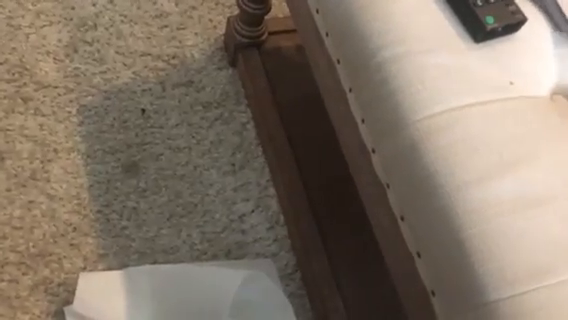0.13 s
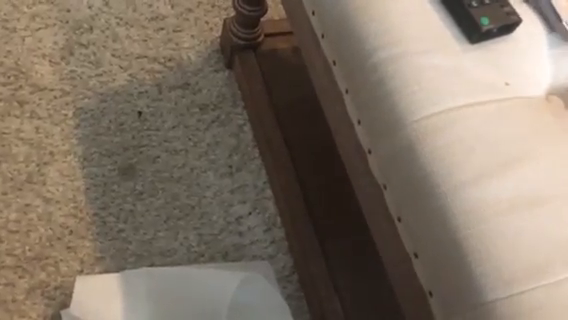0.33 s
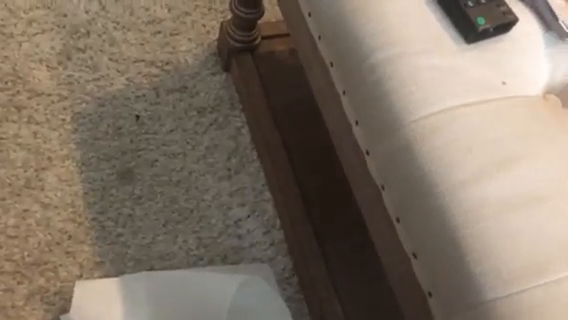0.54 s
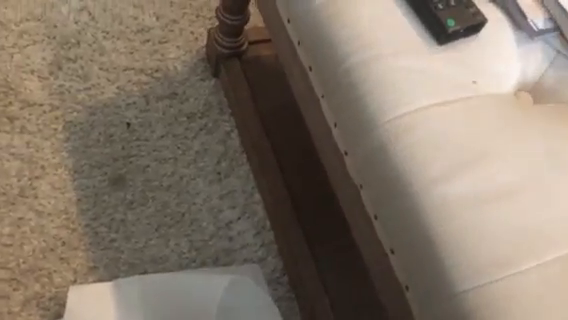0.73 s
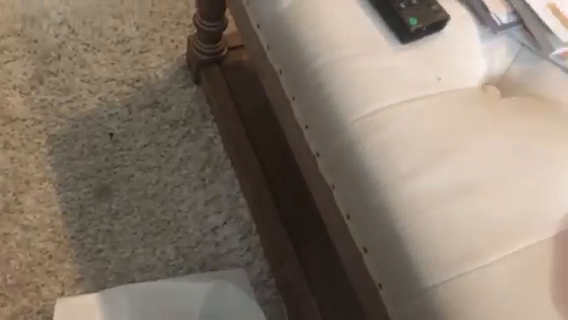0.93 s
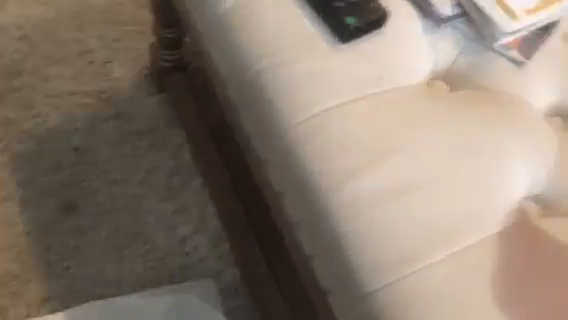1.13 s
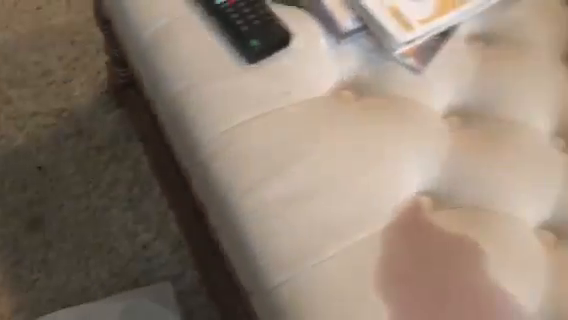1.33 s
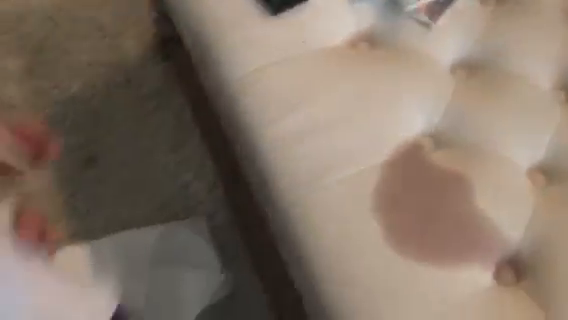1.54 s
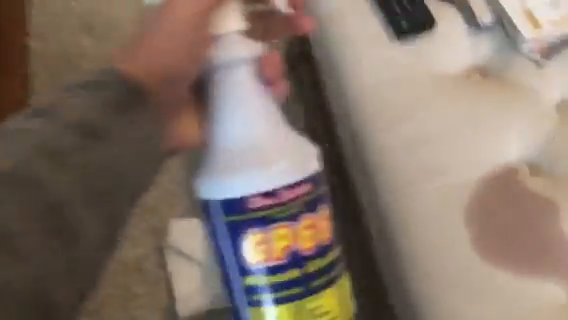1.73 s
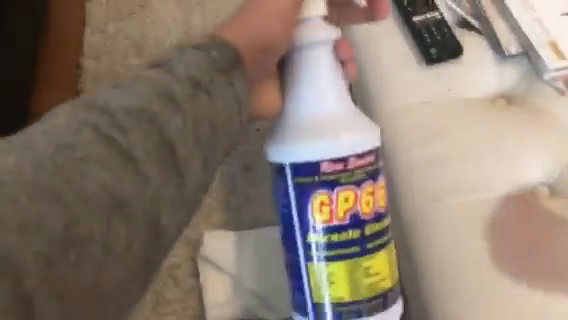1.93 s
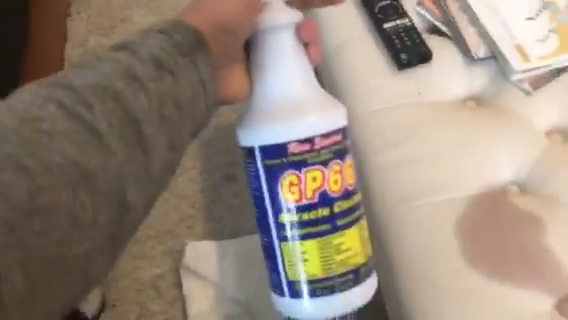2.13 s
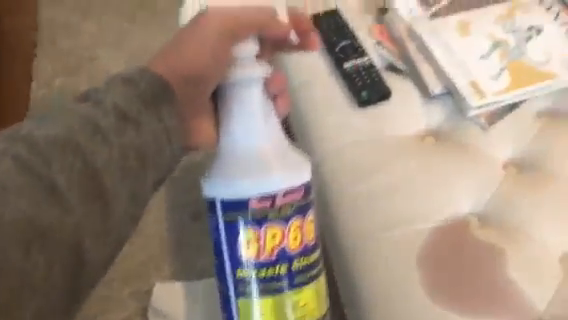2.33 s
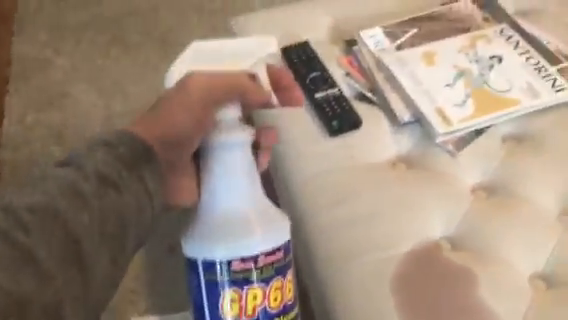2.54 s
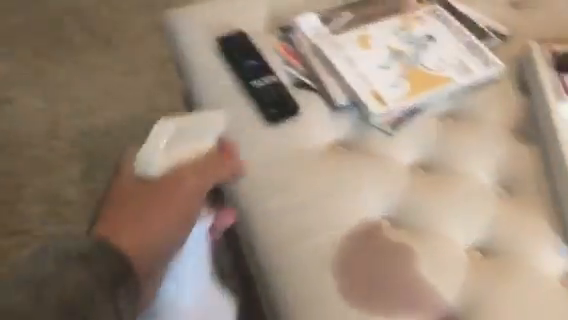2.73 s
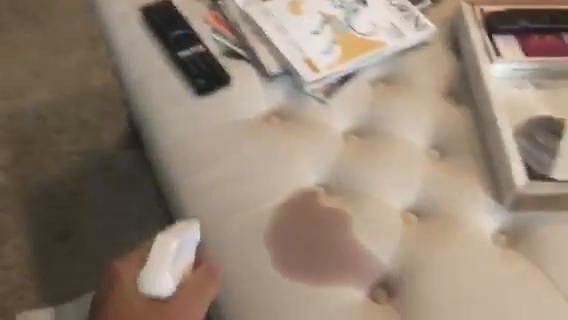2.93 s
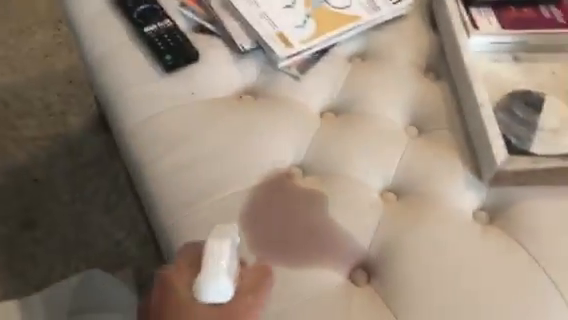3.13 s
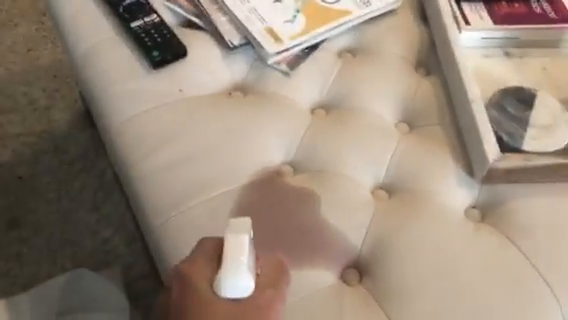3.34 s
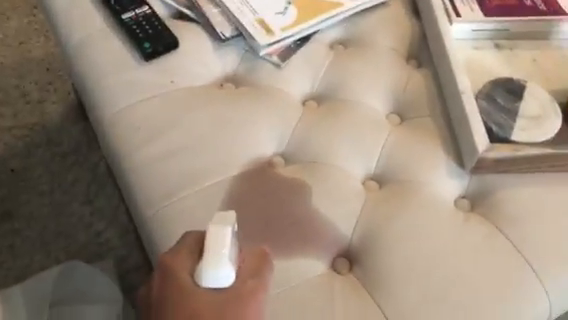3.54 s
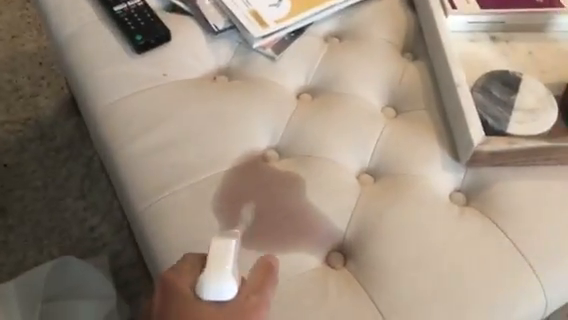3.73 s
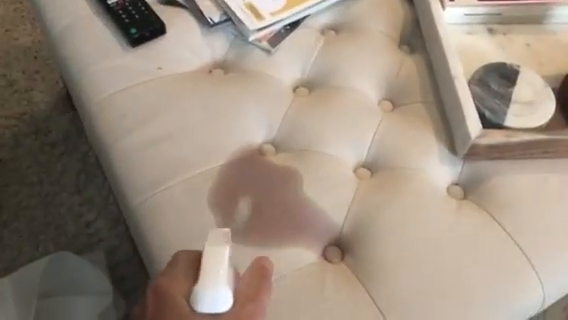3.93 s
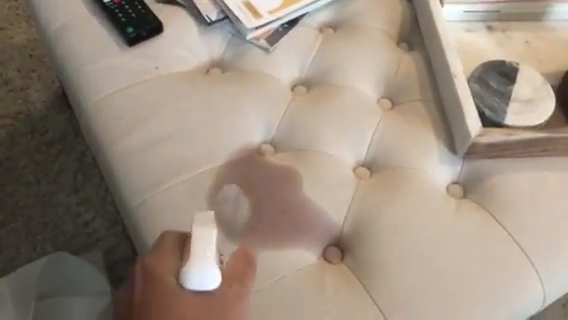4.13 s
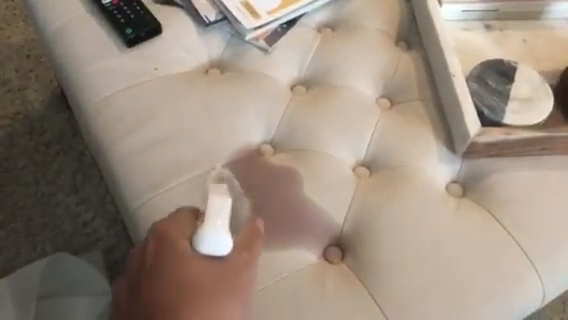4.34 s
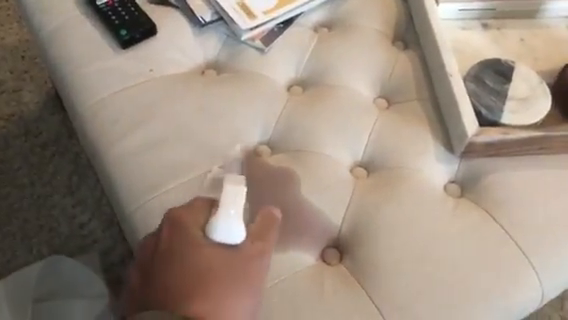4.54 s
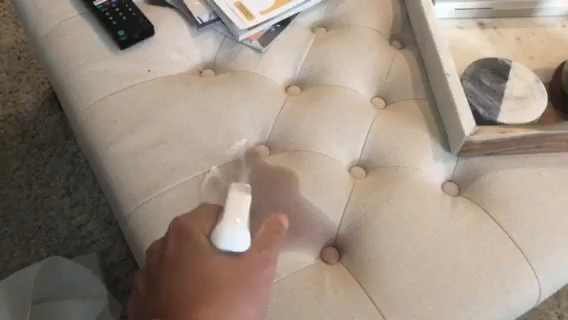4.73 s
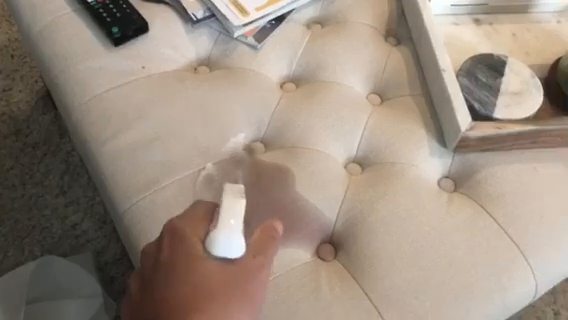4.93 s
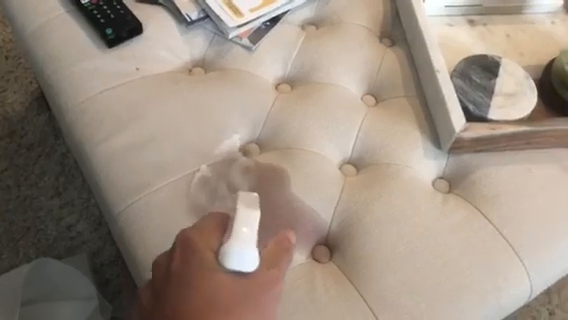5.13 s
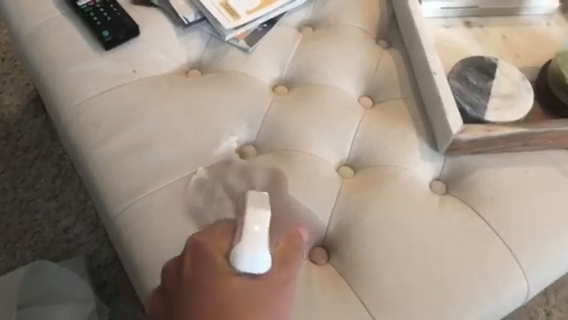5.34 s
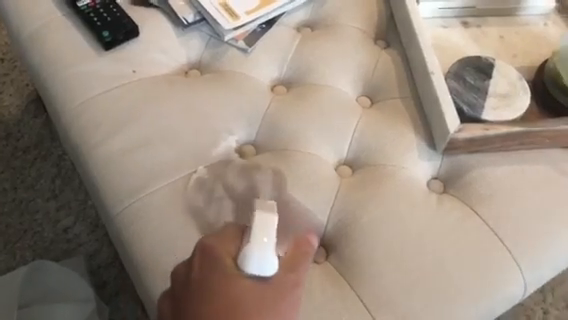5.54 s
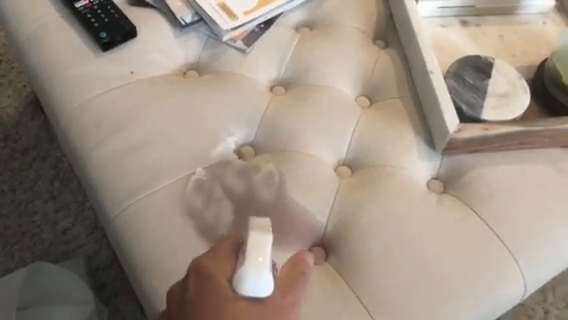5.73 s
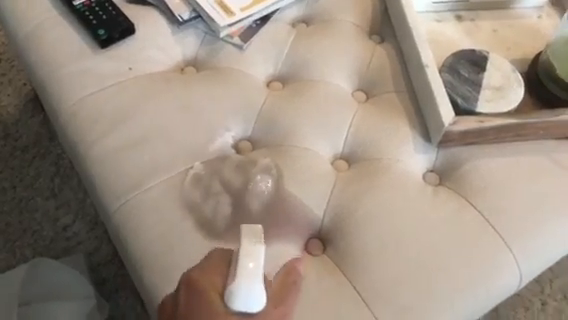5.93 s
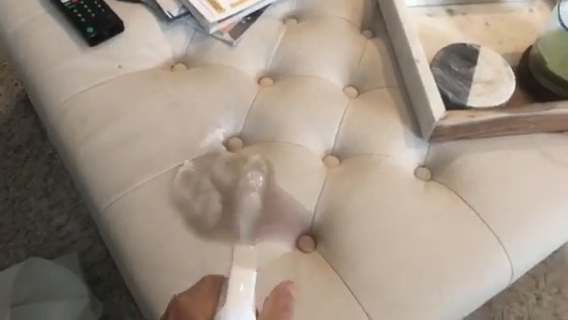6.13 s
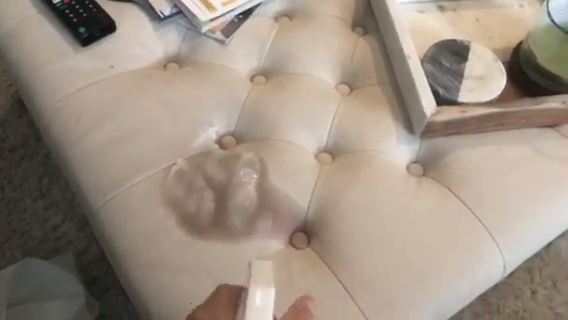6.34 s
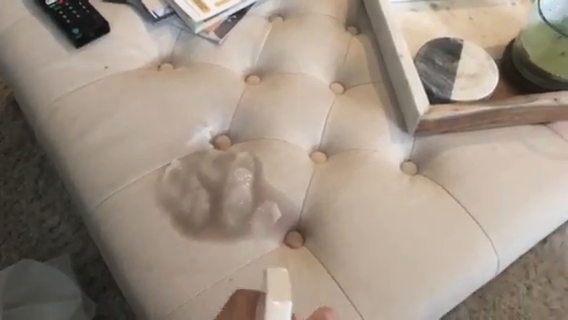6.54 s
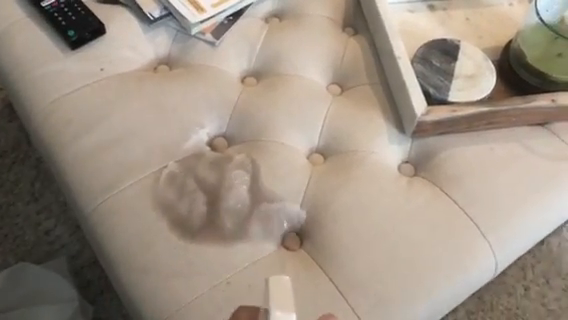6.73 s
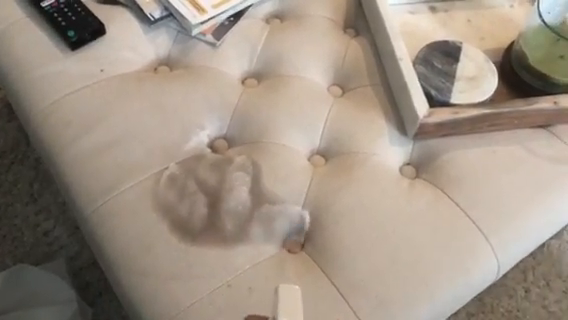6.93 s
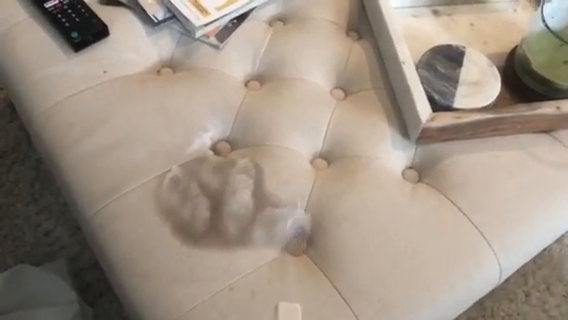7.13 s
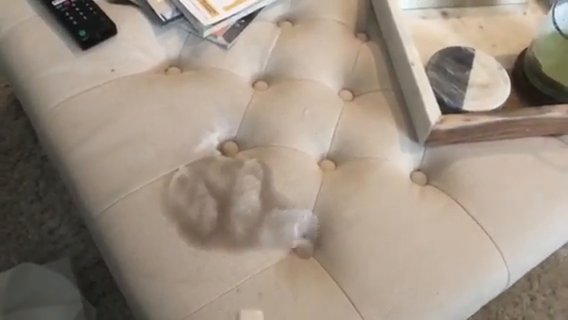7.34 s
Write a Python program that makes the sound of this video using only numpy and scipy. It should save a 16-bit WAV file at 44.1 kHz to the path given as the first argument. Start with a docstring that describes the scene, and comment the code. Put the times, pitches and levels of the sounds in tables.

```python
"""A plastic trigger spray bottle is pumped fourteen times at an upholstered stool, after being taken hold of.
Random drops, coloured by spectra and moving resonances, make the spit, hiss, patter and slurp of each stroke.
Decaying modes make the trigger's clack and the valve's gulp; gliding narrow noise makes the squeaks.
Noise knocks and brushing come before. A faint room tail and a low rumble with a hum lie behind."""
import sys
import numpy as np
from scipy import signal
from scipy.fft import rfft, irfft
from scipy.io import wavfile

SR = 44100
rng = np.random.default_rng(int(sys.argv[2]) if len(sys.argv) > 2 else 0)


def pcm_store(signal):
    """Save signal as 16-bit PCM."""
    levels = np.round(np.clip(np.atleast_2d(signal), -1, 1) * 32767)
    wavfile.write(sys.argv[1], SR, levels.astype(np.int16).T)


N = 325899
T = np.arange(N) / SR


def undb(db):
    """Decibels to gain."""
    return 10 ** (np.asarray(db) / 20)


def unit(x):
    """Scale to rms 1."""
    return x / np.sqrt(np.mean(x ** 2))


def add(track, at_s, sound):
    """Mix a sound in from a time in seconds."""
    i = max(int(at_s * SR), 0)
    track[i:i + len(sound)] += sound[:max(N - i, 0)]


def colour(x, spectrum):
    """Shape x by a spectrum, interpolated over log frequency; rms 1."""
    log_f = np.log2(np.fft.rfftfreq(len(x), 1 / SR) + 1)
    hz, db = np.transpose(spectrum)
    gain = undb(np.interp(log_f, np.log2(hz), db))
    return unit(irfft(rfft(x) * gain, len(x)))


def band(x, hz, spread):
    """Band-pass from hz / spread to hz * spread."""
    spread = max(spread, 1.05)
    edges_hz = np.clip([hz / spread, hz * spread], 10, .48 * SR)
    return signal.sosfilt(signal.butter(2, edges_hz, "band", fs=SR, output="sos"), x)


def walk(size, rate):
    """Smooth chance with a spread near 1: rate random points a second, joined by lines."""
    steps = np.arange(size) * rate / SR
    points = int(steps[-1]) + 2
    return np.interp(steps, np.arange(points), rng.standard_normal(points))


def drops(size, rate, scatter_db):
    """Random tiny impacts of uneven strength, rate a second."""
    hits = rng.random(size) < rate / SR
    signs = rng.choice([-1, 1], size)
    strength_db = scatter_db * np.clip(rng.standard_normal(size), -2, 2)
    return hits * signs * undb(strength_db)


def fade(t, t60):
    """Exponential decay, 60 dB in t60 seconds."""
    return np.exp(-np.log(1000) * t / t60)


def ring(modes, detune):
    """One blow on a set of decaying modes, each slightly detuned at random; peak 1."""
    t = T[:SR // 6]
    y = np.zeros(len(t))
    for hz, db, t60 in modes:
        sign = rng.choice([-1, 1])
        detuned_hz = hz * (1 + detune * rng.standard_normal())
        y += undb(db) * sign * np.sin(2 * np.pi * detuned_hz * t) * fade(t, t60)
    return y / np.abs(y).max()


def echo(x, lag_s, share):
    """Add one reflection."""
    t = T[:len(x)]
    return x + share * np.interp(t - lag_s, t, x, left=0)


def resonance(hz, width_hz):
    """Turbulence ringing in a resonance whose centre moves: smoothed noise on a carrier; rms 1."""
    phase = 2 * np.pi * np.cumsum(hz) / SR
    smooth = signal.butter(2, np.clip(width_hz / 2, 10, SR / 4), fs=SR, output="sos")
    a, b = signal.sosfilt(smooth, rng.standard_normal((2, len(hz))))
    return unit(a * np.cos(phase) + b * np.sin(phase))


# Colour of the spray in air. Each row: frequency in Hz, density in dB per Hz.
MIST_SPECTRUM = [(100, -53), (400, -25), (1500, -4.5), (2300, -15), (2900, -7), (3400, -10.5), (4000, -5.5),
                 (4900, -8), (6000, -4.5), (7300, -2), (8800, 2), (10500, -1.5), (13000, -1.5),
                 (16000, -5.5)]
SPIT_DB = -48


def spit(t, reach_s, width=0.3):
    """Just before landing, low pressure breaks the jet into coarse spurts: sparse, very uneven drops."""
    size = len(t)
    spurts = band(colour(drops(size, rate=9500, scatter_db=10.5), MIST_SPECTRUM), hz=7400, spread=2.9)
    spurts *= undb(SPIT_DB + 3.1 * walk(size, rate=310))
    return spurts * np.exp(-((t / reach_s + .46) / width) ** 2 / 2)


OPEN_S, OPEN_DB, HISS_RELEASE_DB_PER_S = 0.036, 5.5, 444


def hiss(t, progress, jet_s, hiss_db, nozzle_hz, nozzle_db):
    """The cone of mist opens, holds for the jet length and collapses: dense drops plus the nozzle's swirl."""
    size = len(t)
    # the swirl sinks in pitch and stands out more as the pressure falls
    swirl = resonance(nozzle_hz * np.exp(-.55 * progress), width_hz=1700)
    swirl *= undb(nozzle_db + 8.8 * progress)
    mist = colour(drops(size, rate=16000, scatter_db=7.5), MIST_SPECTRUM) + swirl
    opening_db = -OPEN_DB * np.clip(1 - t / OPEN_S, 0, 1)
    collapse_db = -HISS_RELEASE_DB_PER_S * np.maximum(t - jet_s, 0)
    return mist * undb(hiss_db + opening_db + collapse_db + 0.37 * walk(size, rate=169))


# Colour of droplets on cloth. Each row: frequency in Hz, density in dB per Hz.
CLOTH_SPECTRUM = [(80, -34), (180, -7), (320, 4), (480, -1.5), (680, 2.5), (950, -1), (1400, -2.5),
                  (2100, -5.5), (2800, -4), (3900, -8.5), (5000, -11.5), (8000, -18), (16000, -23)]
FLIGHT_S, PATTER_SAG_DB_PER_S, PATTER_RELEASE_DB_PER_S = .025, 44, 219


def patter(t, progress, jet_s, patter_db, patch_hz, patch_db, splash_db=-1.0):
    """Droplets drum on the cloth, thin out with the jet and go on falling a little longer."""
    size = len(t)
    # the wet patch rings a little higher as it fills
    patch_centre_hz = patch_hz * np.exp(.25 * progress + 0.0798 * walk(size, rate=60))
    patch = resonance(patch_centre_hz, width_hz=0.49 * patch_hz)
    impacts = colour(drops(size, rate=2400, scatter_db=3.0), CLOTH_SPECTRUM) + undb(patch_db) * patch
    impacts += undb(-14.5) * resonance(np.full(size, 2900.), width_hz=290)  # a thin ring in the spray
    thinning_db = PATTER_SAG_DB_PER_S * t
    thinning_db += PATTER_RELEASE_DB_PER_S * np.maximum(t - jet_s - FLIGHT_S, 0)
    onset_db = splash_db * np.exp(-(t / 0.0062) ** 2)  # slightly softer first milliseconds
    return impacts * undb(patter_db - thinning_db + onset_db + 0.69 * walk(size, rate=103.0))


# Colour of the refill. Each row: frequency in Hz, density in dB per Hz.
SLURP_SPECTRUM = [(100, -45), (300, 3), (700, -4), (1120, -3), (1400, -8), (2000, -7.5), (2750, -4),
                  (3150, -21), (3650, -1.5), (4300, -7), (5600, -4), (7000, -5), (9300, -6), (10500, -16.5),
                  (16000, -19)]


def slurp(t, draw_s=0.17, half_width_s=0.035, slurp_db=-60):
    """Liquid and air bubbles squeeze through the inlet as the spring returns: drops plus a wandering gurgle."""
    size = len(t)
    gurgle = resonance(3400 * np.exp(0.2 * walk(size, rate=42)), width_hz=490)
    refill = colour(drops(size, rate=1600, scatter_db=4.5), SLURP_SPECTRUM) + undb(-8.5) * gurgle
    refill *= undb(slurp_db + 2.8 * walk(size, rate=90))
    return refill * np.exp(-((t - draw_s) / half_width_s) ** 2)


# The pump strokes. Each row: finger strikes the trigger in seconds, its level in dB, spray lands in seconds,
# jet length in seconds, hiss level in dB, patter level in dB, mid-jet nozzle resonance in Hz,
# its mid-jet share in dB, mid-jet wet patch resonance in Hz, its share in dB.
STROKES = [(3.775, -49, 3.811, 0.051, -43.5, -47, 12300, -25, 1500, -14),
           (4.037, -48, 4.069, 0.07, -40.5, -47.5, 9500, -18, 850, -23),
           (4.284, -46, 4.325, 0.079, -40.5, -46.5, 8900, -20, 329, -15),
           (4.543, -43.5, 4.584, 0.07, -43, -47, 10800, -26, 559, -10),
           (4.784, -35, 4.829, 0.071, -43, -47, 9960, -5, 502, -4.5),
           (5.039, -38.5, 5.081, 0.076, -39.5, -46, 9240, -7, 1252, -12),
           (5.296, -35, 5.340, 0.084, -43.5, -47.5, 9640, -8.5, 590.5, -3.5),
           (5.5707, -35.5, 5.611, 0.085, -42, -46.5, 9400, -6, 645, -8.5),
           (5.833, -37, 5.884, .08, -41.5, -46, 8000, -5.5, 1000, -16),
           (6.113, -38.5, 6.153, 0.093, -41.5, -46.5, 8150, -7, 1398, -17),
           (6.3926, -33.5, 6.434, .083, -40, -47, 8530, -15, 470.7, -5),
           (6.666, -31.5, 6.710, 0.07, -42, -44, 11800, -20, 805.5, -9.5),
           (6.920, -38, 6.968, 0.079, -43, -48.5, 9000, -23, 1483, -2),
           (7.178, -31.5, 7.219, 0.076, -40.5, -49.5, 9400, -30, 845, -7.5)]
CUSHION_ECHO_MS = 0.707


def sprays(lead_s=.055):
    """Each stroke spits, hisses and patters with one reflection off the cushion, then sucks in more liquid."""
    out = np.zeros(N)
    t = T[:SR // 3] - lead_s  # counted from the landing
    for pull_s, _, land_s, jet_s, hiss_db, patter_db, nozzle_hz, nozzle_db, patch_hz, patch_db in STROKES:
        progress = np.clip(t / (jet_s + FLIGHT_S), 0, 1) - .5
        landed = np.clip(t / .0015, 0, 1) * np.clip((t[-1] - t) / .02, 0, 1)
        jet = hiss(t, progress, jet_s, hiss_db, nozzle_hz, nozzle_db)
        jet += patter(t, progress, jet_s, patter_db, patch_hz, patch_db)
        spray = spit(t, land_s - pull_s) + landed * jet
        add(out, land_s - lead_s, echo(spray, CUSHION_ECHO_MS / 1000, share=0.066) + slurp(t))
    return out


# Modes of the trigger. Each row: frequency in Hz, level in dB, t60 in seconds.
TRIGGER_MODES = [(1081, -6.5, 0.04), (1620, -33, .025), (2277, 0.5, 0.016), (2760, 2, 0.02),
                 (3250, 0.5, 0.016), (3725, 3.5, 0.014), (5300, 5, 0.0071), (5700, -3, 0.0074),
                 (8230, -1, .008)]


def plastic_click(treble_db):
    """The trigger's modes, a short bright crack and a brief chatter of loose parts."""
    body = ring(TRIGGER_MODES, detune=0.059)
    t = T[:len(body)]
    crack = unit(band(rng.standard_normal(len(t)), hz=8000, spread=3.6)) * fade(t, t60=0.0045)
    chatter = unit(band(rng.standard_normal(len(t)), hz=2930, spread=3.04)) * fade(t, t60=0.032)
    return body + undb(treble_db - 8.5) * crack + undb(-16) * chatter


# Modes of the valve. Each row: frequency in Hz, level in dB, t60 in seconds.
VALVE_MODES = [(520, 3, 0.047), (650, 1, 0.028), (1035, -21, 0.12)]
# Modes of the bottle. Each row: frequency in Hz, level in dB, t60 in seconds.
BOTTLE_MODES = [(175, 9.6, 0.054), (232, 8.1, 0.05), (357, 3.3, 0.045)]
THUD_DB = -1


def valve_gulp():
    """The valve shuts on the liquid: valve and bottle modes that swell in softly."""
    gulp = ring(VALVE_MODES, detune=0.093) + undb(THUD_DB) * ring(BOTTLE_MODES, detune=0.16)
    swell = 1 - fade(T[:len(gulp)], t60=.022)
    return gulp / (1 + undb(THUD_DB)) * swell


# Single trigger clicks. Each row: start in seconds, level of the modes in dB,
# treble setting in dB (the crack starts 8.5 dB below it, relative to the modes).
CLICKS = [(3.72, -58, 9), (3.758, -49.5, 12), (3.9806, -29, 6.5), (4.048, -44, 18), (4.2406, -28.5, -15),
          (4.301, -44, 14), (4.509, -32.5, -9), (5.0122, -31, -8)]
RATTLE_S, RATTLE_DB, GULP_LAG_S = .009, -2.5, 0.00516
# the piston's return, counted from the landing
RETURN_S, RETURN_SPREAD_S, TICK_DB = 0.18, .04, -48.5


def pump(rattles=3):
    """The trigger clacks and rattles under the finger, the valve gulps, the spring ticks as the piston returns."""
    out = np.zeros(N)
    for pull_s, db, land_s, *_ in STROKES:
        add(out, pull_s, undb(db) * plastic_click(treble_db=3.5))
        for k, chance in enumerate(rng.random(rattles)):
            rattle_s = pull_s + RATTLE_S * (k + .5 + chance) / rattles
            add(out, rattle_s, undb(db + RATTLE_DB) * plastic_click(treble_db=-14))
        add(out, pull_s + GULP_LAG_S, undb(db) * valve_gulp())
        for when, strength in rng.uniform(-1, 1, (2, 2)):
            tick = undb(TICK_DB + 6.6 * strength) * plastic_click(treble_db=13)
            add(out, land_s + RETURN_S + RETURN_SPREAD_S * when, tick)
    for at_s, db, treble_db in CLICKS:
        add(out, at_s, undb(db) * plastic_click(treble_db))
    return out


# the squeaks die down as the air is pumped out of the line
SQUEAK_DB, SQUEAK_HZ, PRIMING_DB_PER_S = -54.5, 3400, 2.5


def squeaks(half_width_s=0.0046, glide_per_s=7, count=2):
    """Short wet chirps on each return, rising as a bubble slips through the valve."""
    out = np.zeros(N)
    t = T[:SR // 10] - 1 / 20
    for _, _, land_s, *_ in STROKES:
        db = SQUEAK_DB - PRIMING_DB_PER_S * (land_s - STROKES[0][2])
        for when, strength, pitch in rng.uniform(-1, 1, (count, 3)):
            chirp = resonance(SQUEAK_HZ * np.exp(.35 * pitch + glide_per_s * t), width_hz=220)
            chirp *= np.exp(-(t / half_width_s) ** 2)
            chirp_s = land_s + RETURN_S + RETURN_SPREAD_S * when
            add(out, chirp_s + t[0], undb(db + 2.5 * strength) * chirp)
    return out


# The bottle is taken hold of. Each row: start in seconds, peak of the blow in dB, its centre in Hz,
# its t60 in seconds, share of the hollow body in dB.
KNOCKS = [(1.109, -32.5, 4750, 0.02, -8.5), (1.128, -46, 1860, 0.066, -17),
          (1.3042, -32.5, 1500, 0.026, -6), (1.473, -50.5, 6150, 0.0091, -15),
          (1.638, -44, 564, 0.064, -24), (1.657, -43, 2480, 0.009, -25), (1.857, -50, 4260, 0.018, -19),
          (2.048, -57, 1810, 0.052, 0), (2.144, -51, 4530, 0.024, -24), (2.699, -46.5, 910, 0.026, -23),
          (1.932, -49, 5030, 0.0096, -24), (3.066, -52, 4400, 0.0087, -8), (3.118, -59, 6000, 0.01, -17)]
# Modes of the hollow bottle. Each row: frequency in Hz, level in dB, t60 in seconds.
HOLLOW_MODES = [(580, -24, 0.031), (830, -13, 0.082), (1117, -3, 0.042), (1280, 2, 0.033),
                (1730, -4.5, 0.02)]


def knocks(thump_db=-53):
    """Dry noise blows that ring the hollow body, with a soft low thump under the second."""
    out = np.zeros(N)
    t = T[:SR // 6]
    for at_s, db, hz, t60, hollow_db in KNOCKS:
        blow = band(rng.standard_normal(len(t)) * fade(t, t60), hz, spread=1.88)
        blow /= np.abs(blow).max()
        add(out, at_s, undb(db) * (blow + undb(hollow_db) * ring(HOLLOW_MODES, detune=0.076)))
    t = T[:SR // 2]
    add(out, KNOCKS[1][0], undb(thump_db) * np.sin(2 * np.pi * 178 * t) * fade(t, t60=0.26))
    return out


# Sleeve and fingers brush the bottle. Each row: centre in seconds, half width in seconds,
# level in dB, centre frequency in Hz.
BRUSHES = [(.78, 0.032, -76, 4770), (1.161, 0.1, -71, 3020), (1.324, 0.054, -65.5, 2000),
           (1.383, 0.047, -64.5, 3150), (1.91, 0.031, -63, 2360), (2.617, 0.016, -62.5, 6200),
           (2.901, 0.027, -66.5, 910), (3.08, 0.12, -75, 2000)]


def brushing():
    """Friction as a flickering band of tiny impacts under a bell-shaped swell."""
    out = np.zeros(N)
    for at_s, half_width_s, db, hz in BRUSHES:
        grains = unit(band(drops(N, rate=2800, scatter_db=3.5), hz, spread=2.7))
        out += grains * undb(db + 3.5 * walk(N, rate=83)) * np.exp(-((T - at_s) / half_width_s) ** 2)
    return out


def carpeted_room(x, wet_db=-19, t60=0.64):
    """A faint tail from the walls: convolution with decaying band-passed noise."""
    t = T[:SR // 2]
    tail = band(rng.standard_normal(len(t)), hz=1280, spread=4.9) * fade(t, t60) * (t > .005)
    return x + undb(wet_db) * signal.fftconvolve(x, tail / np.linalg.norm(tail))[:N]


def wavering_tone(hz, phase_spread, rate):
    """A sine with a wandering phase in radians; rms 1."""
    return unit(np.sin(2 * np.pi * hz * T + phase_spread * walk(N, rate)))


# Colour of the rumble. Each row: frequency in Hz, density in dB per Hz.
ROOM_SPECTRUM = [(20, -62), (30, -33), (43, -13.5), (60, -10), (92, -7), (150, -15.5), (280, -17),
                 (390, -20.5), (500, -24.5), (950, -30.5), (2300, -37.5), (10000, -42), (16000, -49)]
ROOM_DB = -67.5
# the hum grows louder once and stays so
HUM_HZ, HUM_QUIET_DB, HUM_LOUD_DB, HUM_SWELL_S, HUM_SWELL_LENGTH_S = 109.8, -80, -66.5, 4.42, 1.0


def room_tone():
    """A low, gently wavering rumble of noise with a hum, a deeper drone and a faint whine, all sines."""
    rumble = colour(rng.standard_normal(N), ROOM_SPECTRUM) * undb(ROOM_DB + 1.2 * walk(N, rate=10.5))
    hum_db = np.interp(T - HUM_SWELL_S, [0, HUM_SWELL_LENGTH_S], [HUM_QUIET_DB, HUM_LOUD_DB])
    hum = wavering_tone(HUM_HZ, .5, rate=5.4) * undb(hum_db + 3.0 * walk(N, rate=11))
    drone = wavering_tone(58, 0.52, rate=4.2) * undb(-78)
    whine = wavering_tone(388, 0.6, rate=9) * undb(-83 + 4.3 * walk(N, rate=3))
    return rumble + hum + drone + whine


def scene():
    """The same mono mix feeds both channels."""
    mono = carpeted_room(sprays() + pump() + squeaks() + knocks() + brushing()) + room_tone()
    return np.array([mono, mono])


LOW_CUT_HZ, TOP_HZ = 36, 15900


def record(dry):
    """The phone thins the deepest bass and cuts the top."""
    thinned = signal.sosfilt(signal.butter(4, LOW_CUT_HZ, "high", fs=SR, output="sos"), dry)
    return signal.sosfilt(signal.ellip(10, .2, 70, TOP_HZ, fs=SR, output="sos"), thinned)


dry = scene()
out = record(dry)
pcm_store(out)
```